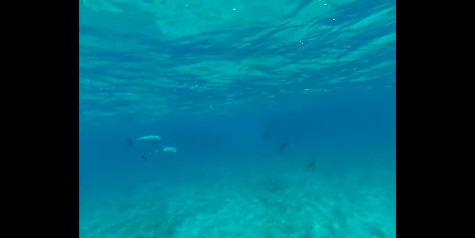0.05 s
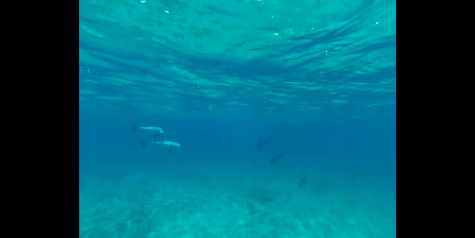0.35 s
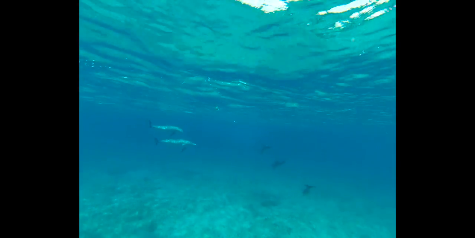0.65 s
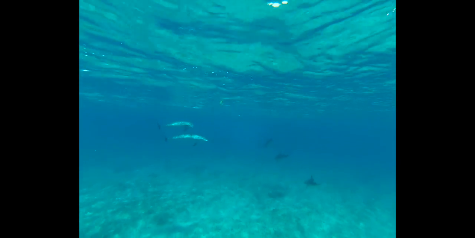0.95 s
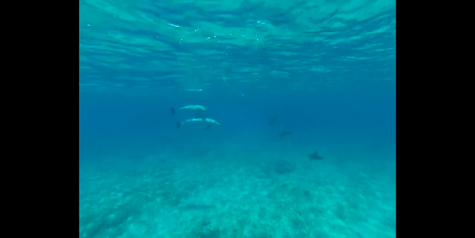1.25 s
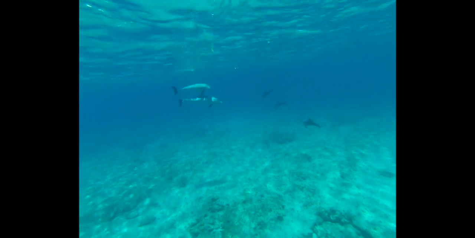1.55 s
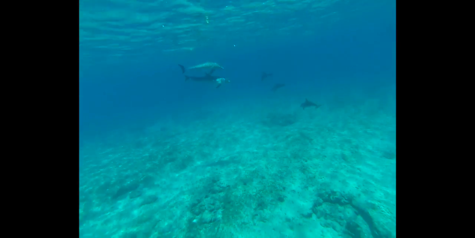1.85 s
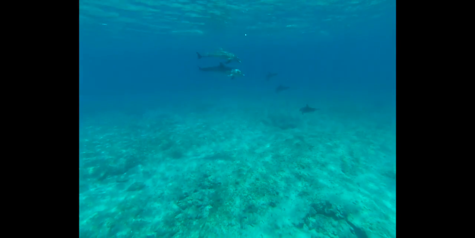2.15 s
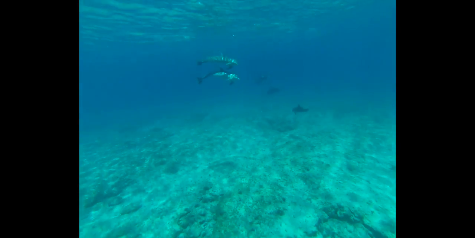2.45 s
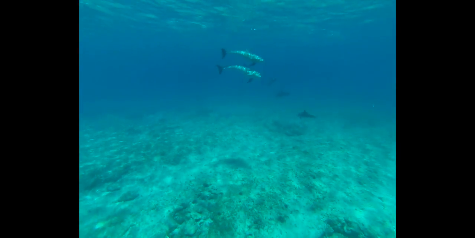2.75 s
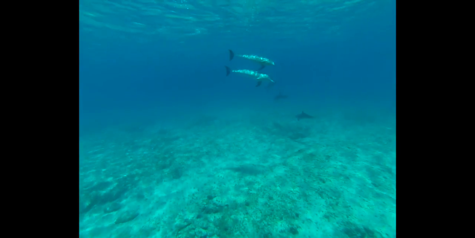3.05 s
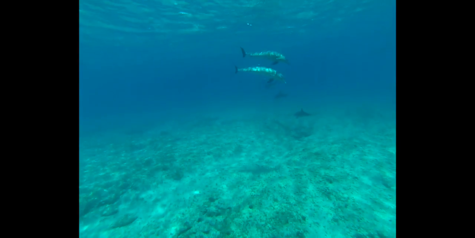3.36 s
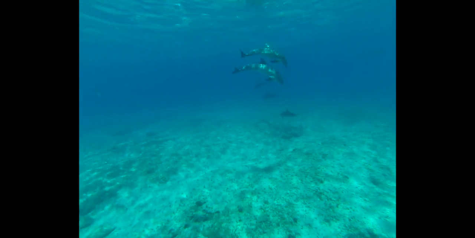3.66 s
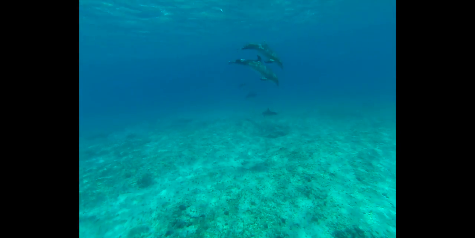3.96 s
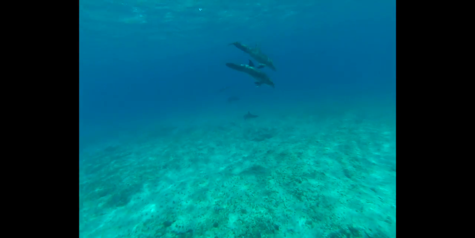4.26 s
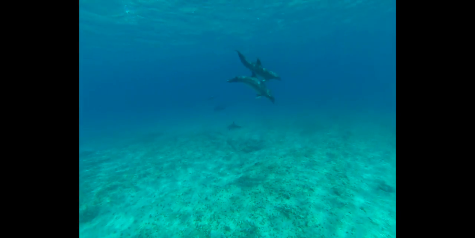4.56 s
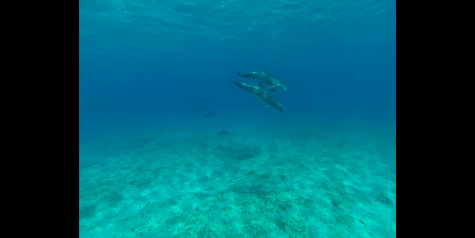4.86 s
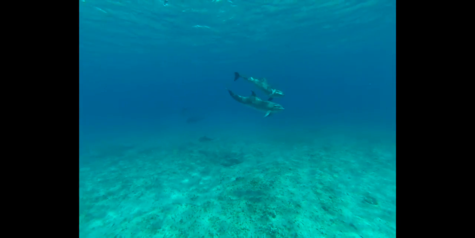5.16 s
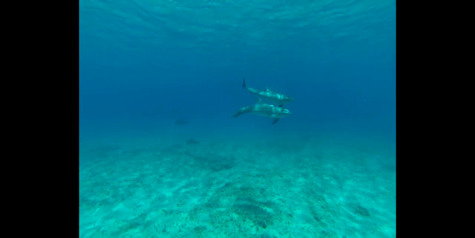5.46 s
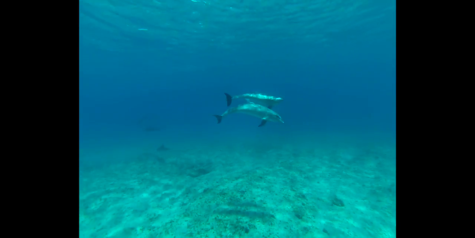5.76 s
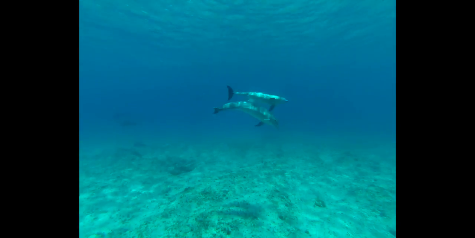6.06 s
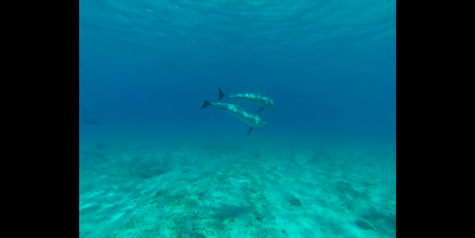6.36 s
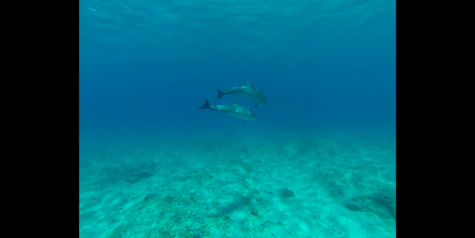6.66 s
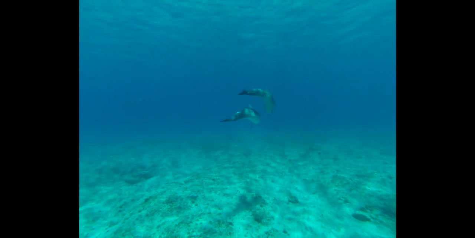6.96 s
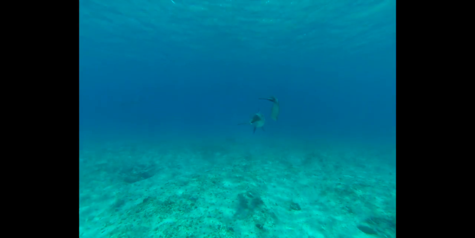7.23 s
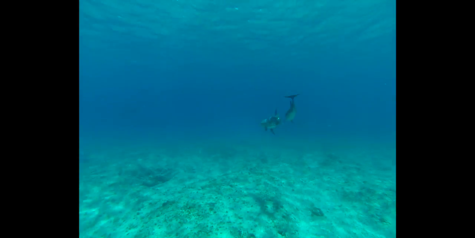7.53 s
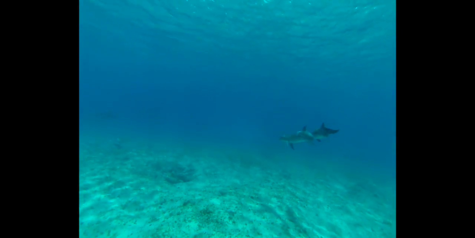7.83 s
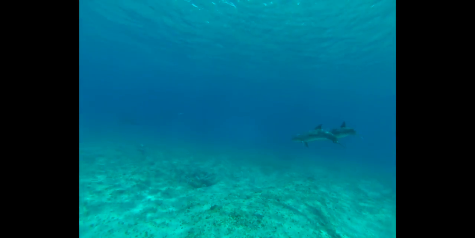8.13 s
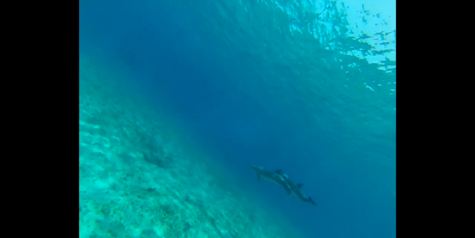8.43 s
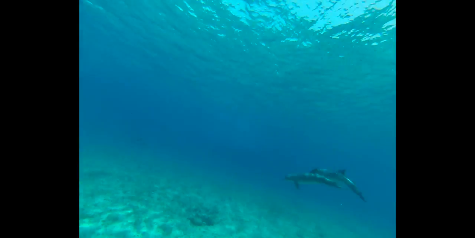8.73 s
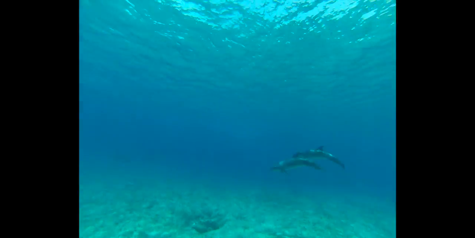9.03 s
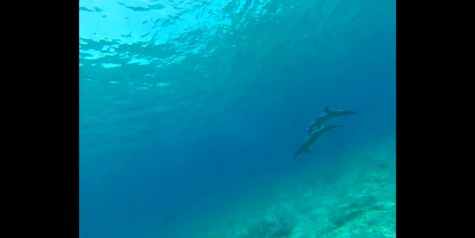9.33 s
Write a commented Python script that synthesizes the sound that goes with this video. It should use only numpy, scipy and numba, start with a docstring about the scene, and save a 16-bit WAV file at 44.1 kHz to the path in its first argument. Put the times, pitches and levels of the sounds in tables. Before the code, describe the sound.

High dolphin whistles and rapid clicks sound through rumbling water and shrimp snaps, interrupted by gurgling bubbles and close handling thumps.

```python
"""Dolphins over a shallow seabed

Dolphins whistle and send out sonar click trains, heard by a hand-held camera in a waterproof case.
Eddies rumble past, a distant motor drones, shrimp claws crackle and bubbles ring nearby.
Hands bump the case and excite its modes, and a limiter ducks after the hardest blows."""
import sys
import numpy as np
from scipy import signal
from scipy.fft import rfft, irfft
from scipy.io import wavfile
from scipy.ndimage import uniform_filter1d, minimum_filter1d
from numba import njit

SR = 44100
rng = np.random.default_rng(int(sys.argv[2]) if len(sys.argv) > 2 else 0)


def wrap_up_sound(samples):
    """Save the sound to the file named by the first command line argument, as 16-bit audio."""
    columns = np.atleast_2d(samples).T
    # keep every value between -1 and 1, then stretch to whole-number steps
    tamed = np.clip(columns, -1, 1)
    steps = np.round(tamed * 32767).astype(np.int16)
    wavfile.write(sys.argv[1], SR, steps)


N = 422919
TIME = np.arange(N) / SR


def undb(db):
    """Amplitude ratio of a level in decibels."""
    return 10 ** (np.asarray(db) / 20)


def unit(x):
    """Normalisation to rms 1."""
    return x / np.sqrt(np.mean(x ** 2))


def peak(x, db):
    """Normalisation to a peak level."""
    return x * undb(db) / np.abs(x).max()


def curves(table):
    """Linear interpolation of each column over time."""
    times, *columns = np.transpose(table)
    return [np.interp(TIME, times, column) for column in columns]


def progress(t, length):
    """Linear ramp from 0 to 1 over the given length."""
    return np.clip(t / max(length, 1 / SR), 0, 1)


def add(out, start_s, x):
    """Superposition of a sound from a given time on."""
    i = int(np.clip(start_s * SR, 0, N - 1))
    out[i:i + len(x)] += x[:N - i]


def wander(rate_hz):
    """Low-pass noise: smoothed random steps with a spread near 1."""
    hold = max(int(SR / rate_hz), 2)
    steps = np.repeat(rng.standard_normal(N // hold + 1), hold)
    return 1.3 * uniform_filter1d(uniform_filter1d(steps, hold), hold)[:N]


def fade(t60):
    """Exponential decay by 60 dB in t60 seconds, with its time axis."""
    t = TIME[:int(t60 * SR) + 64]
    return t, np.exp(-np.log(1000) * t / t60)


def colour(x, spectrum):
    """Minimum-phase filter through (Hz, dB) points, falling steeply beyond the ends."""
    hz, db = np.transpose(spectrum)
    octaves = np.log2(np.fft.rfftfreq(16384, 1 / SR) + 1)
    outside = np.abs(octaves - np.clip(octaves, np.log2(hz[0]), np.log2(hz[-1])))
    response_db = np.interp(octaves, np.log2(hz), db) - np.minimum(36 * outside, 90)
    cepstrum = irfft(np.log(undb(response_db)))
    half = len(cepstrum) // 2
    cepstrum[1:half] *= 2  # folding the cepstrum makes the filter causal
    cepstrum[half + 1:] = 0
    impulse_response = irfft(np.exp(rfft(cepstrum)))[:half]
    return signal.oaconvolve(x, impulse_response)[:len(x)]


@njit
def resonate(x, hz, width_hz):
    """Second-order resonator with gain 1 at its moving centre."""
    y, band_state, low_state = np.empty(len(x)), 0., 0.
    for i in range(len(x)):
        g, damping = np.tan(np.pi * hz[i] / SR), width_hz / hz[i]
        band = (band_state + g * (x[i] - low_state)) / (1 + g * (g + damping))
        band_state = 2 * band - band_state
        low_state += 2 * g * band
        y[i] = damping * band
    return y


def scatter(x, t60, wet_db):
    """Multipath propagation: echoes from the waves and the seabed follow the direct sound."""
    t = TIME[:SR // 4]
    tail = rng.standard_normal(len(t)) * undb(-60 * t / t60)
    return x + undb(wet_db) * signal.oaconvolve(x, tail / np.linalg.norm(tail))[:N]


# Strength of the flow past the case: time_s, level_db
FLOW_LEVEL = [(0, -32.5), (.8, -42), (1.8, -25.5), (2.1, -16), (2.6, -23.5), (3, -21.5), (3.35, -29),
              (5.2, -32), (5.9, -27.5), (6.35, -30), (6.7, -28.5), (8.05, -26.5), (8.55, -20.5), (8.8, -24),
              (9.05, -31.5), (9.5, -16.5)]
# Spectrum of the eddies: frequency_hz, gain_db
RUMBLE_SPECTRUM = [(18, -3), (27, 0), (38, -2), (52, -6), (66, -3), (95, -17), (120, -17), (160, -30),
                   (260, -32)]


def flow_rumble():
    """Turbulence: eddies press on the case as it moves through the water."""
    flow_db, = curves(FLOW_LEVEL)
    return unit(colour(rng.standard_normal(N), RUMBLE_SPECTRUM)) * undb(flow_db)


# Slow course of the far sounds: time_s, drone_db, hollow_centre_hz, crackle_db
FAR_SOUNDS = [(1, -42, 542, -52), (1.7, -35.5, 490, -52.5), (2.3, -37.5, 508, -49), (3, -36.5, 617, -50),
              (5, -33.5, 670, -49.5), (6.2, -35, 689, -49.5), (8, -35, 625, -49), (9, -37, 607, -51)]
# Spectrum of the low wash: frequency_hz, gain_db
WASH_SPECTRUM = [(76, -34), (130, -33.5), (167, -11), (270, -10), (312, -7), (404, -11.5), (510, -3.5),
                 (638, 1), (749, -12), (805, -16), (1100, -42.5), (1430, -51.5), (2420, -120)]
# Partials of the motor: pitch_hz, relative_db
MOTOR_LINES = [(166, -15.5), (622, -11), (657, -14.5), (731, -13), (742, -18), (820, -53), (862, -23.5)]


def distant_drone(width_hz=150., hollow_db=-4, wash_db=-3, motor_db=-1, drift_hz=2.58):
    """A motor's line spectrum lies over a drifting hollow resonance and a wash of low noise."""
    drone_db, centre_hz, _ = curves(FAR_SOUNDS)
    hollow = resonate(rng.standard_normal(N), centre_hz, width_hz)
    hollow = resonate(hollow, centre_hz, width_hz)
    wash = colour(rng.standard_normal(N), WASH_SPECTRUM) * undb(2.16 * wander(18))
    motor = np.zeros(N)
    for hz, db in MOTOR_LINES:
        amplitude = np.sqrt(2) * undb(db + 2.48 * wander(5.5))
        phase = 2 * np.pi * np.cumsum(hz + drift_hz * wander(9)) / SR
        motor += amplitude * np.sin(phase)
    noise = undb(hollow_db) * unit(hollow) + undb(wash_db) * unit(wash)
    return undb(drone_db) * (noise + undb(motor_db) * motor)


def shrimp_bed(spectrum, snaps_per_s, spread_db, hiss_db):
    """Shot noise: countless snaps of uneven size, the farthest merging into hiss."""
    sizes = undb(spread_db * np.minimum(rng.exponential(size=N), 6)) * rng.choice([-1, 1], N)
    impulses = sizes * (rng.random(N) < snaps_per_s / SR)
    pops = unit(scatter(impulses, t60=.008, wet_db=-2))
    return unit(colour(pops + undb(hiss_db) * rng.standard_normal(N), spectrum))


# Spectrum of far crackle and of a near snap's body: frequency_hz, gain_db
CRACKLE_SPECTRUM = [(560, -36.5), (950, 3), (1090, -19.5), (1540, -9), (1670, 2), (1770, -8), (1930, -2),
                    (2010, -3), (2180, -7.5), (2420, -5), (2620, -12), (2860, -6.5), (3050, -14.5),
                    (3960, -26.5), (6710, -120)]
# A ringing band within the crackle: time_s, level_db
RING_LEVEL = [(0, -56.5), (1.5, -57.5), (2.3, -53), (3.3, -55), (4.8, -52), (6, -65.5), (7.4, -64),
              (9, -56)]


def far_crackle(ring_hz=1265, half_width_hz=350):
    """Distant snaps add incoherently; one narrow band of the crackle swells and dies away."""
    *_, crackle_db = curves(FAR_SOUNDS)
    ring_db, = curves(RING_LEVEL)
    bed = shrimp_bed(CRACKLE_SPECTRUM, snaps_per_s=700, spread_db=3, hiss_db=2.5)
    bed *= undb(crackle_db + .7 * wander(3.3))
    band = [(ring_hz - half_width_hz, -12), (ring_hz, 0), (ring_hz + half_width_hz, -12)]
    ring = shrimp_bed(band, snaps_per_s=330, spread_db=2, hiss_db=-3)
    return bed + ring * undb(ring_db)


# Spectrum of the finest crackle: frequency_hz, gain_db
FIZZ_SPECTRUM = [(3800, 0), (4400, -7), (5400, -8), (6200, -11), (7400, -8), (8300, -12), (9200, -15),
                 (10200, -15), (11500, -13), (12700, -17), (14300, -19), (15400, -33)]


def shrimp_fizz(mid_db=-64.2, side_db=-73.5):
    """Decorrelation: independent mid and side signals give the finest crackle its width."""
    mid = shrimp_bed(FIZZ_SPECTRUM, snaps_per_s=500, spread_db=3.5, hiss_db=5)
    side = shrimp_bed(FIZZ_SPECTRUM, snaps_per_s=500, spread_db=5.5, hiss_db=-24)
    return mid * undb(mid_db), side * undb(side_db)


# Spectrum of one claw's crack: frequency_hz, gain_db
SNAP_SPECTRUM = [(2000, -14), (3800, -3), (5300, -1), (6200, -4), (7500, 1), (9200, -14), (11500, -11),
                 (16000, -25)]


def stray_snaps(count=150):
    """Spreading loss: shrimp a little way off tick at random, the nearer ones louder."""
    out = np.zeros(N)
    t, decay = fade(.014)
    for when, nearness in rng.random((count, 2)):
        crack = colour(rng.standard_normal(len(t)) * decay, SNAP_SPECTRUM)
        add(out, when * N / SR, peak(crack, -57 + 12 * nearness ** 2))
    return out


# Claws snapping close by: start_s, crack_peak_db, body_emphasis_db
NEAR_SNAPS = [(0.028, -43, -20), (0.7103, -43, 8), (0.8866, -36, 13), (1.123, -41.5, -8), (1.949, -40, -5),
              (1.98, -33, -4), (2.4334, -36, -3), (2.5102, -31, 7), (2.83, -35.5, 7), (2.9804, -38.5, 13),
              (5.756, -42.5, 8), (5.955, -37.5, 0), (6.655, -42, -5), (7.257, -35, 13), (7.4071, -40, -6),
              (8.2768, -32.5, 10), (8.3928, -24, 12), (9.2374, -31.5, -1)]


def near_snaps(body_trim_db=-3):
    """Broadband transients: each claw gives a sharp crack with a lower body."""
    out = np.zeros(N)
    t, decay = fade(.016)
    for start, db, emphasis_db in NEAR_SNAPS:
        bursts = rng.standard_normal((2, len(t))) * decay
        crack = peak(colour(bursts[0], SNAP_SPECTRUM), db)
        body = peak(colour(bursts[1], CRACKLE_SPECTRUM), db + emphasis_db + body_trim_db)
        add(out, start, crack + body)
    return scatter(out, t60=.04, wet_db=-13)


# Air pockets pinching off, large and small: start_s, peak_db, pitch_hz
BUBBLE_ROWS = [(1.246, -33, 311), (1.611, -33, 910), (1.757, -26, 277), (1.886, -27, 295),
               (2.341, -17, 590), (2.344, -30, 1196), (2.489, -17, 880), (2.49, -20, 1270),
               (3.52, -27, 482), (3.685, -22, 609), (3.804, -26, 654), (4.915, -31, 1370),
               (4.945, -39, 3230), (5.654, -27, 965), (5.844, -31, 197), (6.979, -20, 156),
               (7.039, -25, 133), (7.145, -12.5, 524), (7.322, -24, 332), (8.234, -19, 537),
               (8.319, -6.5, 605), (8.323, -12.5, 1516), (8.337, -18, 2494), (8.342, -17, 1124),
               (8.369, -14, 990), (8.375, -17, 616)]


def bubbles(ring_cycles=32, rise=.06, onset_s=.0012, pop_db=-12, faint_count=10):
    """Volume resonance: air pinches off with a rough pop, then rings and rises in pitch as it fades."""
    out = np.zeros(N)
    first_s = BUBBLE_ROWS[0][0]
    faint = [(first_s + when * (N / SR - first_s), -35 - 2 * smallness, 300 * 4 ** smallness)
             for when, smallness in rng.random((faint_count, 2))]
    for start, db, hz in BUBBLE_ROWS + faint:
        t60 = ring_cycles / hz
        t, decay = fade(t60)
        ring = np.sin(2 * np.pi * hz * t * (1 + rise * t / t60))
        band = signal.butter(3, [hz * .7, hz * 1.3], "bandpass", fs=SR, output="sos")
        pop = unit(signal.sosfilt(band, rng.standard_normal(len(t))))
        envelope = decay * (1 - np.exp(-t / onset_s))
        add(out, start, peak((ring + undb(pop_db) * pop) * envelope, db))
    return scatter(out, t60=.08, wet_db=-12)


# Soft blows of the hand: start_s, peak_db, pitch_hz, t60_s
HAND_BUMPS = [(1.752, -18, 120, 0.13), (2.338, -13, 113, 0.088), (7.004, -17.5, 102, 0.11),
              (7.403, -7, 98, .051), (8.251, -10, 55, .05), (8.275, 1, 67.6, 0.058),
              (8.313, 0.5, 36.3, 0.35), (8.388, 10, 63, 0.051), (8.42, -4.5, 63.3, 0.34),
              (9.237, -6.5, 63.4, 0.21), (9.253, 11.5, 45, 0.064), (9.358, 3.5, 92, 0.21),
              (9.426, -10, 112, 0.14), (9.524, -1, 85, 0.069), (9.582, -1.5, 170, 0.043)]


def hand_bumps(push_s=.003):
    """Damped oscillation: a soft push rocks the whole case."""
    out = np.zeros(N)
    for start, db, hz, t60 in HAND_BUMPS:
        t, decay = fade(t60)
        envelope = decay * (1 - np.exp(-t / push_s))
        add(out, start, peak(-np.sin(2 * np.pi * hz * t) * envelope, db))
    return out


# Resonances of the case: frequency_hz, width_hz, gain_db
CASE_MODES = [(252, 46, 11), (350, 91, 5.5), (510, 420, 4.5), (940, 99, -2.5), (1240, 170, 5.5),
              (1570, 480, -3.5), (2100, 180, -17), (2283, 75, 7), (3400, 170, -8.5), (7100, 12000, -5.5)]
# Hard blows on the case: start_s, peak_db, brightness_hz, t60_s
CASE_KNOCKS = [(1.751, -8.5, 453, 0.022), (2.338, -20.5, 350, .09), (2.488, -13, 1450, .05),
               (2.982, -22, 1810, 0.016), (3.366, -33.5, 700, 0.013), (4.884, -36, 1100, 0.025),
               (5.656, -38, 810, 0.027), (8.312, -7, 1500, 0.098), (8.336, -11, 1840, 0.048),
               (8.369, -10, 850, 0.12), (8.456, -18.5, 1180, 0.061), (9.249, 11, 2080, 0.02),
               (9.285, -11, 980, .023), (9.428, -9.5, 900, .028), (9.512, -7.5, 790, 0.073),
               (9.533, -11, 895, 0.011), (9.549, 2.5, 1800, 0.083)]
# Fingers sticking and slipping: start_s, end_s, slip_peak_db, brightness_hz
FINGER_RUBS = [(4.664, 4.71, -33, 700), (8.79, 8.815, -26.5, 150), (8.953, 9.075, -27.5, 178),
               (9.35, 9.398, -5.5, 630), (9.551, 9.59, -16, 1250)]


def case_contacts(slip_gap_s=.0103, slip_t60=.037, tap_count=5, tap_db=-31, tap_hz=900, tap_t60=.021):
    """Modal excitation: knocks, stick-slip friction and stray light taps rattle the case."""
    out = np.zeros(N)
    slips = [(s, db, hz, slip_t60)
             for start, end, db, hz in FINGER_RUBS for s in np.arange(start, end, slip_gap_s)]
    taps = [(s, tap_db, tap_hz, tap_t60) for s in rng.uniform(CASE_KNOCKS[0][0], N / SR, tap_count)]
    for start, db, brightness_hz, t60 in CASE_KNOCKS + taps + slips:
        t, decay = fade(t60)
        force = undb(-11) * rng.standard_normal(len(t)) * decay  # scrape
        force[0] += undb(1.5)  # impact
        force = signal.sosfilt(signal.butter(2, brightness_hz, fs=SR, output="sos"), force)
        ring = sum(undb(mode_db) * resonate(force, np.full(len(t), float(hz)), float(width_hz))
                   for hz, width_hz, mode_db in CASE_MODES)
        add(out, start, peak(ring, db))
    return out


def loose_air(count=16, loudest_db=-37, lowest_hz=1600):
    """Smaller bubbles resonate higher: tiny ones, shaken off by the first knock, plink for a second."""
    out = np.zeros(N)
    t, decay = fade(.035)
    for lateness, smallness, weakness in rng.random((count, 3)):
        hz = lowest_hz * 2 ** smallness
        plink = np.sin(2 * np.pi * hz * t) * decay
        add(out, CASE_KNOCKS[0][0] + lateness ** 2, undb(loudest_db - 10 * weakness) * plink)
    return out


# Spectrum of one sonar click: frequency_hz, gain_db
CLICK_SPECTRUM = [(4000, -36), (7500, -17), (9200, -19), (10900, -2), (12000, 0), (13000, -5), (15200, -10),
                  (17000, -26)]
# Click trains: start_s, end_s, first_gap_s, gap_change_per_click_s, level_db, treble_db
CLICK_TRAINS = [(.014, .59, .04442, -.0007, -37, 0), (.9745, 1.6, .0404, -.0003, -39, -7),
                (2.586, 3.03, .0411, .0003, -44, -7), (3.7444, 3.79, .0294, 0, -43, -14),
                (5.459, 6.11, .0426, -.00006, -47, -5)]


def sonar_clicks(gain_db=1, beam_edge_db=-3.5, uneven_db=1.5):
    """Directivity: a beam of pulses sweeps past, softer at each train's ends and duller off axis."""
    out = np.zeros(N)
    t, decay = fade(.009)
    index = np.arange(20)
    for start, end, gap, gap_change, db, treble_db in CLICK_TRAINS:
        times = start + index * gap + gap_change * index ** 2 / 2
        spectrum = [(hz, band_db + np.interp(hz, (12000, 15200), (0, treble_db)))
                    for hz, band_db in CLICK_SPECTRUM]
        for s in times[times < end]:
            click = .15 * rng.standard_normal(len(t)) * decay  # faint echoes
            click[0] += 1  # direct pulse
            beam_db = beam_edge_db * (2 * progress(s - start, end - start) - 1) ** 2
            peak_db = db + gain_db + beam_db - uneven_db * rng.standard_normal()
            add(out, s, peak(colour(click, spectrum), peak_db))
    return out


def whistle_tone(hz, db, overtone_db=-11):
    """Phase is the integral of frequency: a gliding sine, with a second harmonic on low notes."""
    phase = 2 * np.pi * np.cumsum(hz) / SR
    overtone = undb(overtone_db) * np.clip((7700 - hz) / 900, 0, 1)
    edges = signal.windows.tukey(len(hz), .03)
    return np.sqrt(2) * undb(db) * edges * (np.sin(phase) + overtone * np.sin(2 * phase))


# Contour of one long whistle: time_s, pitch_hz, level_db
FALLING_CONTOUR = [(1.875, 14450, -70), (1.92, 13350, -58), (2.04, 12000, -57), (2.125, 9250, -56),
                   (2.18, 8600, -57), (2.32, 7510, -53), (2.4, 7020, -50), (2.51, 6130, -61),
                   (2.615, 5200, -55), (2.648, 5790, -60), (2.662, 6300, -76)]


def falling_whistle(waver):
    """A frequency sweep: one long fall with an upward hook at its end."""
    out = np.zeros(N)
    on = (TIME > FALLING_CONTOUR[0][0]) & (TIME < FALLING_CONTOUR[-1][0])
    hz, db = curves(FALLING_CONTOUR)
    hz = uniform_filter1d(hz, size=1200) * waver
    out[on] = whistle_tone(hz[on], db[on])
    return out


# Strength of a whistle against its pitch: pitch_hz, gain_db
WHISTLE_RESPONSE = [(5000, -7), (8000, -7.5), (10000, -5), (11800, 0.5), (12500, -5.5), (13300, -14),
                    (14500, -10)]
# Whistle gestures, in which a move of 0 s is left out:
# trough_time_s, trough_hz, plunge_s, climb_s, hold_s, shelf_hz, shelf_rise_hz, flick_s, level_db
WHISTLE_GESTURES = [(1.378, 10520, 0, .106, .14, 11700, 560, 0, -65),
                    (1.915, 7500, .135, 0, 0, 7500, 0, 0, -72),
                    (3.679, 6190, 0, .245, .245, 11160, 1900, 0, -57.5),
                    (4.341, 7570, .155, .148, .207, 10310, 560, .078, -54.5),
                    (5.013, 6970, .15, 0, 0, 6970, 0, 0, -59),
                    (6.295, 4970, 0, .344, .189, 10370, 490, .091, -58.5),
                    (7.104, 10710, 0, .299, .105, 12010, 950, .092, -66),
                    (7.19, 8040, .159, .127, .16, 10210, 1350, .092, -52),
                    (7.91, 6520, .207, 0, 0, 6520, 0, 0, -63),
                    (8.657, 5220, 0, .231, .139, 11650, 60, .096, -52),
                    (9.403, 5910, .162, .12, .2, 10410, 850, 0, -51)]


def gesture_whistles(waver, top_hz=14500, flick_share=.8, emerge_db=-9):
    """Frequency modulation: the pitch plunges to a trough, climbs to a shelf, holds and flicks up."""
    out = np.zeros(N)
    for trough_s, trough_hz, plunge, climb, hold, shelf_hz, rise_hz, flick, db in WHISTLE_GESTURES:
        on = (TIME > trough_s - plunge) & (TIME < trough_s + climb + hold + flick)
        t = TIME[on] - trough_s
        hz = trough_hz + (top_hz - trough_hz) * progress(-t, plunge) ** 1.3
        hz += (shelf_hz - trough_hz) * np.sin(np.pi / 2 * progress(t, climb)) ** 2
        hz += rise_hz * progress(t - climb, hold)
        hz += (top_hz - hz) * flick_share * progress(t - climb - hold, flick) ** 2
        swell_db = emerge_db * (1 - progress(t, climb)) if plunge == 0 else 0
        response_db = np.interp(hz, *np.transpose(WHISTLE_RESPONSE))
        out[on] += whistle_tone(hz * waver[on], db + swell_db + response_db)
    return out


def dolphin_whistles(pitch_wobble=.003, flutter_db=3):
    """Interference: the wavering glides overlap their own echoes and flutter in level."""
    waver = 1 + pitch_wobble * wander(140)
    voices = gesture_whistles(waver) + falling_whistle(waver)
    return scatter(voices * undb(flutter_db * wander(60)), t60=.093, wet_db=-8)


def scene(contact_side_db=-27):
    """Superposition at the sealed case: only fizz and contacts differ between left and right."""
    fizz, fizz_side = shrimp_fizz()
    dolphins = dolphin_whistles() + sonar_clicks()
    shrimp = near_snaps() + stray_snaps() + far_crackle() + fizz
    air = bubbles() + loose_air()
    handling = case_contacts() + hand_bumps()
    mid = flow_rumble() + distant_drone() + shrimp + air + handling + dolphins
    side = fizz_side + undb(contact_side_db) * case_contacts()
    return np.array([mid + side, mid - side])


@njit
def hold_peaks(x, fall):
    """Peak detection: the envelope jumps to each peak and sinks exponentially."""
    envelope, held = np.empty(len(x)), 0.
    for i in range(len(x)):
        held = max(abs(x[i]), held * fall)
        envelope[i] = held
    return envelope


def record(dry, ceiling_db=-5, release_db_per_s=55, cutoff_hz=15600):
    """Look-ahead limiting ducks hard blows and recovers slowly; a low-pass cuts the top."""
    envelope = hold_peaks(dry.mean(axis=0), float(undb(-release_db_per_s / SR)))
    gain = np.minimum(1, undb(ceiling_db) / (envelope + 1e-9))
    gain = uniform_filter1d(minimum_filter1d(gain, size=128), size=128)
    lowpass = signal.ellip(8, .2, 70, cutoff_hz, fs=SR, output="sos")
    return signal.sosfilt(lowpass, dry * gain)


dry = scene()
out = record(dry)
wrap_up_sound(out)
```